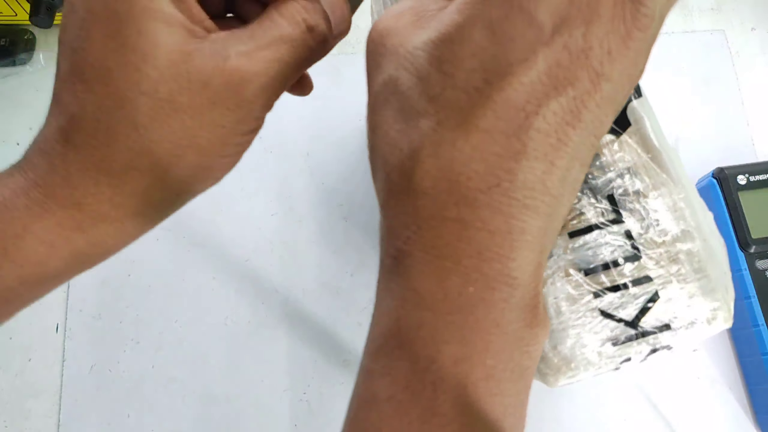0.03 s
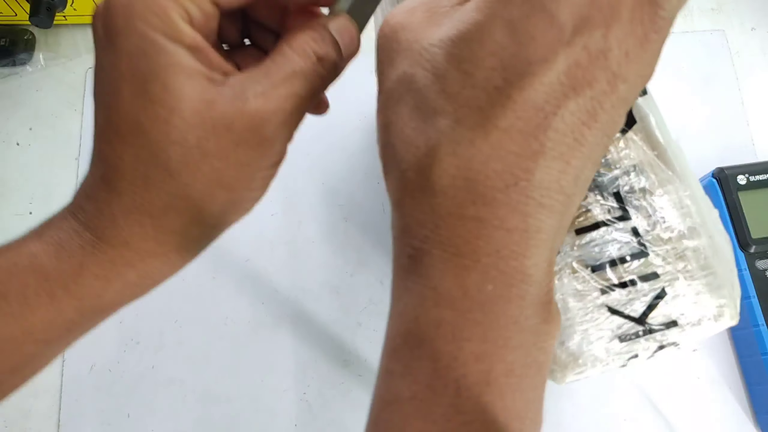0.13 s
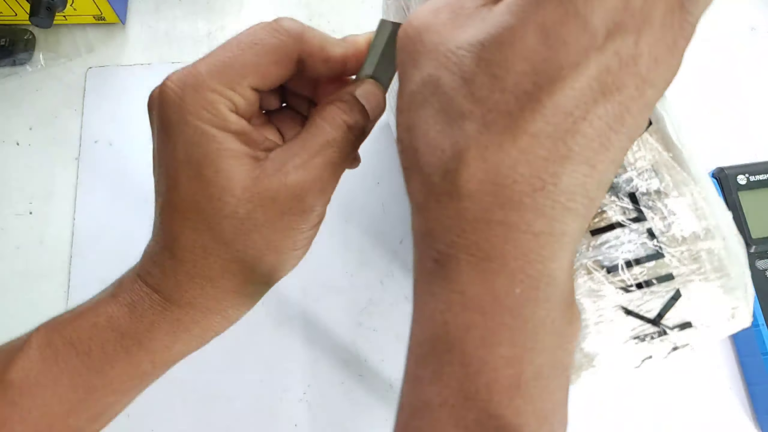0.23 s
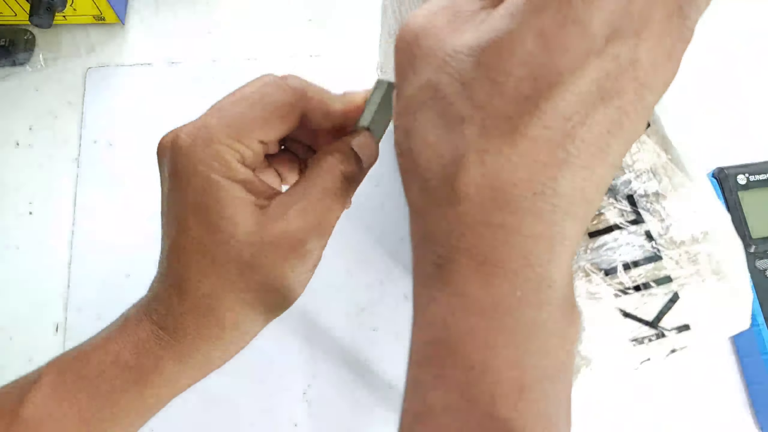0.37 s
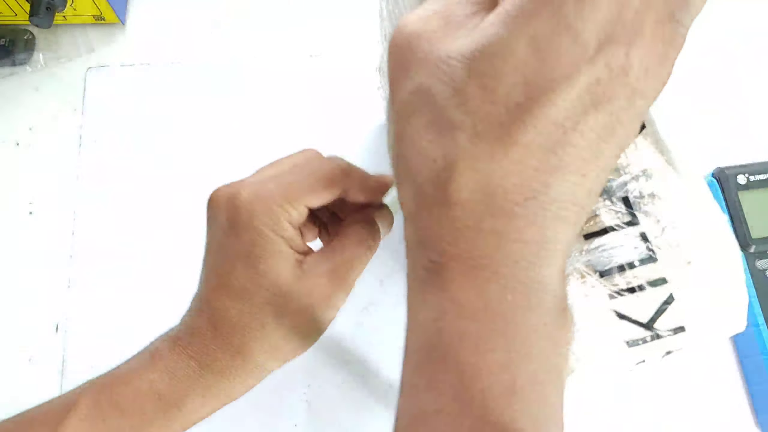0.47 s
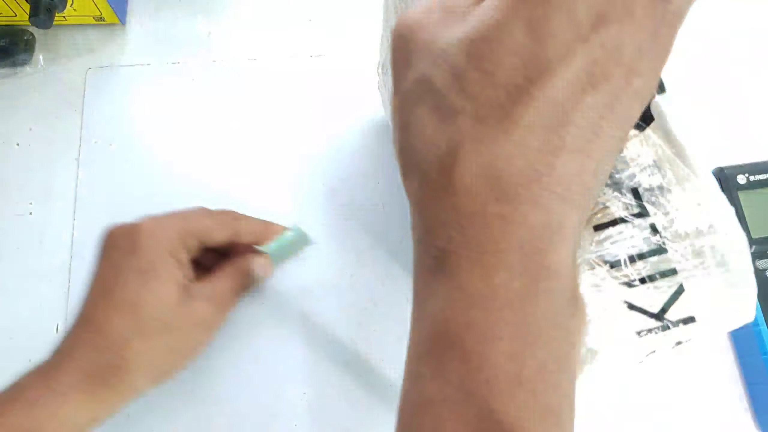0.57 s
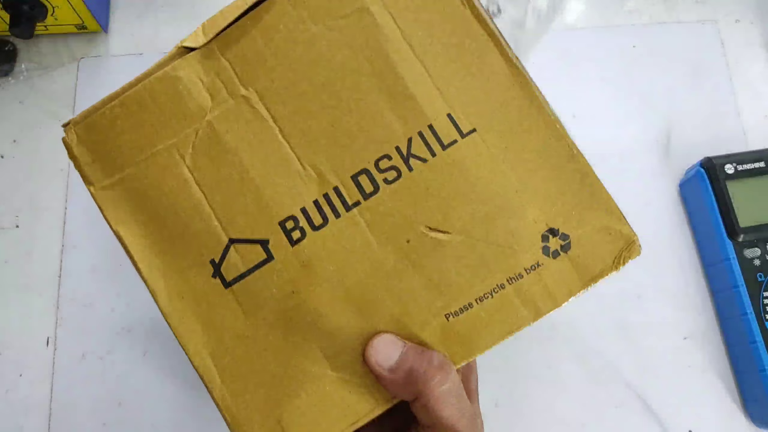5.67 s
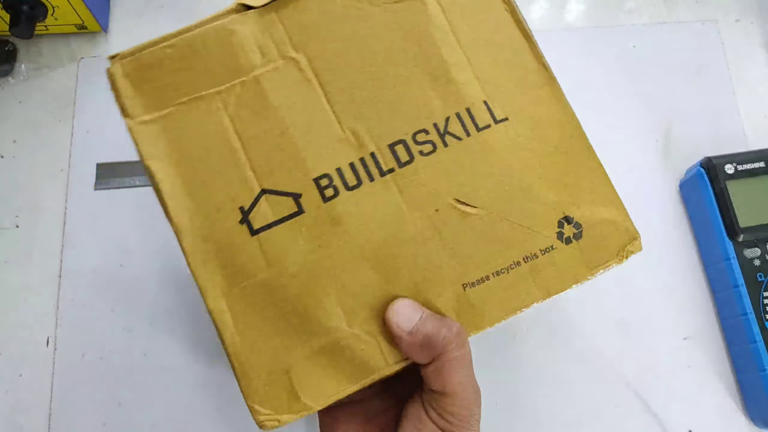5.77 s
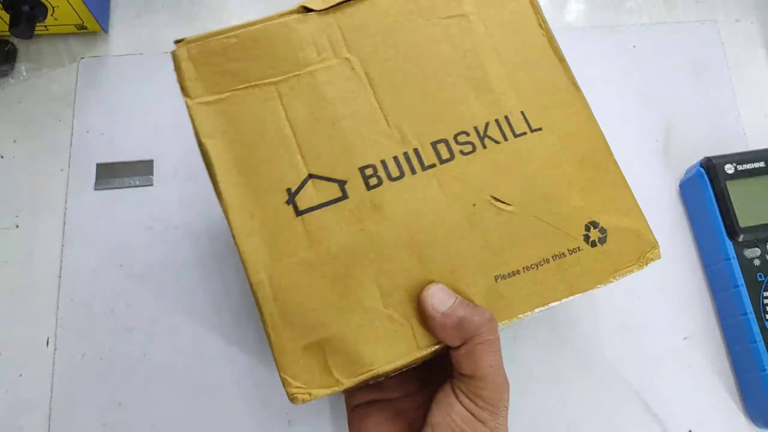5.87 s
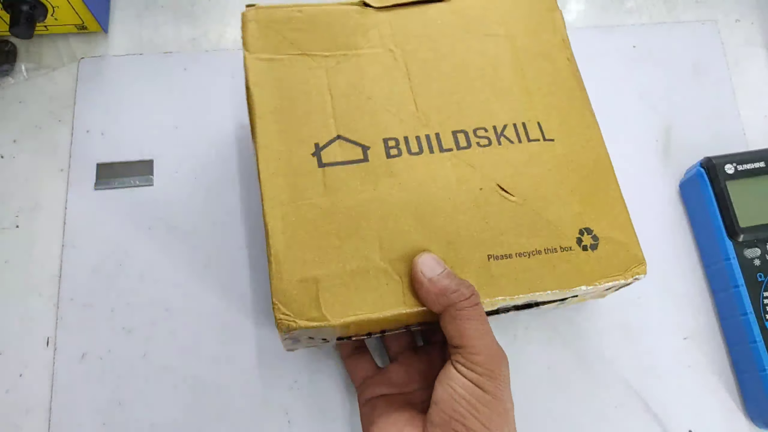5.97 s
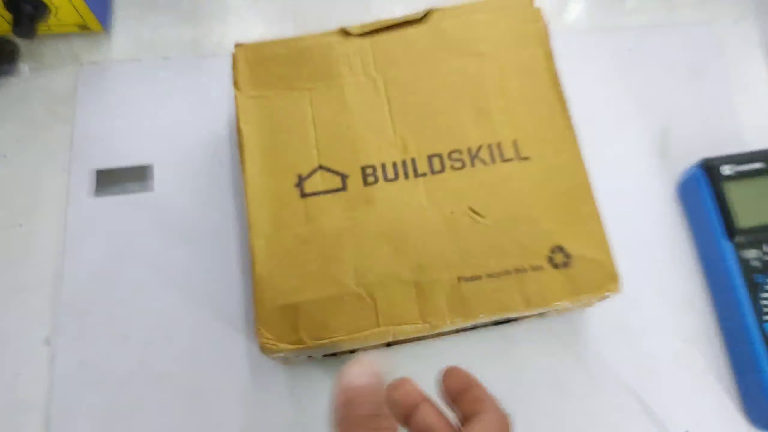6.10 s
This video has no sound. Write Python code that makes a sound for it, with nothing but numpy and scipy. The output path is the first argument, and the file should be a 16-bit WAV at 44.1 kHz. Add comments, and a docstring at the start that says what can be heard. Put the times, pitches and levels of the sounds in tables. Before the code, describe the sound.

Close, dry sound of plastic film being pulled off a small cardboard box in a quiet room. From 0 to 1 s, light crinkles, small snaps and card rasps come in short tugs, with a ragged low groan near 0.45 s and faint hoarse squeaks. At 1.15 to 1.45 s a dense, bright tearing burst cracks sharply, the loudest crackling. It eases, then hollow panel knocks land around 1.8 to 2.2 s, strongest at 1.93 and 2.18. From 2.4 to 3.3 s tugs crackle steadily, with dull taps near 2.9 and a low thump at 3.24. A short creak slows at 3.4 to 3.57 s. Snaps and rasping continue to 4.5 s, nearly stop around 4.77, then return with a crack at 5.04. Sparse rustles and light knocks at 5.45 to 5.6 fade before a firm low thump at 6.1 s. Low rumble swells beneath.

```python
"""Plastic wrap is pulled and torn off a small cardboard box close by, over a desk.
The film crinkles, the card rasps and the panels drone: countless tiny random slips, each layer with its colour.
Creases snap as short decaying tones with noise bursts; knocks flex a panel and ring the modes of the box.
The film squeaks as hoarse narrow noise, and sticks and slips in a low groan and a creak that ends slower.
Slow low noise rumbles as the box moves; a short room tail and a faint quiet-room noise surround it all."""
import sys
import numpy as np
from scipy import signal
from scipy.fft import rfft, irfft, next_fast_len
from scipy.io import wavfile
from scipy.ndimage import uniform_filter1d

SR = 44100
rng = np.random.default_rng(int(sys.argv[2]) if len(sys.argv) > 2 else 0)


def inscribe(sig):
    """Save sig as 16-bit PCM at rate SR to the path in sys.argv[1].

    A 1-D sig is mono; a 2-D sig holds one channel per row.
    Samples are clipped to [-1, 1] before scaling.
    """
    pcm = np.round(np.clip(np.atleast_2d(sig).T, -1, 1) * 32767)
    wavfile.write(sys.argv[1], SR, pcm.astype(np.int16))


N = 270553   # length of the scene in samples


def from_db(db):
    """Turn decibels into a gain."""
    return 10 ** (np.asarray(db) / 20)


def rms_one(x):
    """Scale to unit power."""
    return x / np.sqrt(np.mean(x ** 2) + 1e-20)


def in_time(rows):
    """Draw straight lines between the rows of a table, giving each column a value at every sample."""
    s, *columns = np.transpose(rows)
    return [np.interp(np.arange(N) / SR, s, column) for column in columns]


def add(out, s, sound):
    """Mix a sound into out, starting at s seconds."""
    start = max(round(s * SR), 0)
    part = out[start:start + len(sound)]
    part += sound[:len(part)]


def drift(rate_hz):
    """Smooth random wandering with a spread of about 1; a higher rate wanders faster."""
    step = 40   # samples between the slow values, joined by straight lines
    r = np.exp(-2 * step * np.pi * rate_hz / SR)
    noise = rng.standard_normal(N // step + 2002)
    slow = signal.lfilter([1], [1, -2 * r, r * r], noise)[2000:]   # drop the filter's start-up
    return np.interp(np.arange(N) / step, np.arange(len(slow)), rms_one(slow))


def fade(t, t60):
    """Exponential decay that falls by 60 dB in t60 seconds."""
    return np.exp(-np.log(1000) * t / max(t60, 1e-4))


def resonate(x, hz, width_hz):
    """Ring at one pitch; the gain is 1 at the top of the resonance."""
    r = np.exp(-np.pi * width_hz / SR)
    top = np.array([1, 0, -1]) * (1 - r * r) / 2
    return signal.lfilter(top, [1, -2 * r * np.cos(2 * np.pi * hz / SR), r * r], x + 1e-18)


def colour(x, spectrum):
    """Filter to the given spectrum without sounding early, falling 20 dB per octave beyond its ends."""
    size = 2 * next_fast_len(len(x))
    octave = np.log2(np.maximum(np.arange(size // 2 + 1) * SR / size, 1))
    hz, db = np.transpose(spectrum)
    outside = np.abs(octave - np.clip(octave, np.log2(hz[0]), np.log2(hz[-1])))
    gain_db = np.interp(octave, np.log2(hz), db) - 20 * outside
    # folding the cepstrum forward in time gives a minimum-phase filter
    cepstrum = irfft(np.log(from_db(gain_db)))
    cepstrum[1:size // 2] *= 2
    cepstrum[size // 2 + 1:] = 0
    return irfft(rfft(x, size) * np.exp(rfft(cepstrum, size)))[:len(x)]


def friction(spectrum, per_s, spread_db, hiss_db, flutter_db, shimmer_db=4.0, even_s=0.063):
    """Countless tiny slips of uneven size, each with a pitch of its own, over a fine hiss; about unit power."""
    born = rng.random(N) < per_s / SR
    sizes = from_db(spread_db * np.minimum(rng.exponential(1, N), 3))
    slips = rms_one(born * sizes * rng.choice([-1, 1], N))
    pitches = np.geomspace(spectrum[0][0], min(spectrum[-1][0], SR / 3), 16)
    dealt = rng.integers(0, len(pitches), N)
    force = slips + from_db(hiss_db) * rng.standard_normal(N)
    # each patch of the surface rings for a few cycles at its own pitch, and comes into and out of contact
    grains = np.zeros(N)
    for k, hz in enumerate(pitches):
        patch = resonate(force * (dealt == k), hz, 0.19 * hz)
        grains += patch * from_db(shimmer_db * drift(30.5))
    # slips come in clumps, while the hand keeps the mean effort steady
    rub = rms_one(colour(grains, spectrum)) * from_db(flutter_db * drift(131))
    return rub / np.sqrt(uniform_filter1d(rub ** 2, max(int(even_s * SR), 2)) + 1e-9)


# Steady handling between the tugs, with two rests.
# Each row: time in seconds, crinkle of the film in dB, rasp of the card in dB.
STEADY_PULL = [(0.0, -49.5, -61), (0.27, -48.5, -47), (0.59, -40.5, -53), (0.8, -43.5, -50),
               (1.13, -37, -51), (1.48, -35, -52.5), (1.68, -43, -47.5), (2.3, -37.5, -40),
               (2.78, -39.5, -45.5), (3.3, -37, -44.5), (4.0, -36, -41), (4.24, -38.5, -47),
               (4.5, -41, -43.5), (4.77, -66.5, -71), (4.88, -49.5, -44), (5.08, -43, -41.5),
               (5.24, -46.5, -45), (5.31, -55.5, -56.5), (5.42, -43.5, -42), (5.69, -43, -47),
               (5.88, -51, -56), (6.13, -59, -52)]
DRONE_RE_RASP_DB = -4.5   # between tugs the panels drone in step with the rasp
# Moments when the film hangs slack and the rubbing drops. Each row: start in seconds, end in seconds.
SLACK_MOMENTS = [(0.557, 0.64), (2.328, 2.35), (3.063, 3.07), (3.587, 3.619), (4.216, 4.244)]
SLACK_DB, SLACK_EASE_S = -11, 0.0018   # size of the drop, and time to ease in or out


def effort():
    """The hand's steady pull plus tugs, less the slack moments: levels of crinkle, rasp and drone in dB."""
    film_db, card_db = in_time(STEADY_PULL)
    steady = from_db([film_db, card_db, card_db + DRONE_RE_RASP_DB])
    t = np.arange(N) / SR
    slack = np.zeros(N)
    for start, end in SLACK_MOMENTS:
        slack += np.clip(np.minimum(t - start, end - t) / SLACK_EASE_S, 0, 1)
    return 10 * np.log10(steady ** 2 + tugs()) + SLACK_DB * slack


# Colours of the three rubbing layers: the film, the card, and the panels of the box.
# Each row: pitch in Hz, relative filter gain in dB.
FILM_COLOUR = [(1200, -13.5), (2000, -2.5), (2800, 0.5), (4000, 1), (7500, 3.5), (10000, 1.5), (13000, -4),
               (16000, -6)]
CARD_COLOUR = [(400, -15), (600, 2), (900, 3.5), (1300, 5), (1800, 3.5), (2700, -2), (4000, -2.5),
               (7000, -22)]
PANEL_COLOUR = [(50, 3.5), (90, -7), (140, -9), (215, -1.5), (320, -2), (390, -6.5), (460, 2.5),
                (600, -15.5), (900, -10.5)]


def rubbing():
    """The film crinkles brightly; sliding makes the card rasp and the panels drone."""
    crinkle_db, rasp_db, drone_db = effort()
    film = friction(FILM_COLOUR, per_s=1200, spread_db=1.0, hiss_db=5.5, flutter_db=2.5, shimmer_db=2.5)
    card = friction(CARD_COLOUR, per_s=350, spread_db=3.0, hiss_db=7.0, flutter_db=3.0)
    panels = friction(PANEL_COLOUR, per_s=460, spread_db=2.5, hiss_db=-3.0, flutter_db=4.0)
    return from_db(crinkle_db) * film + from_db(rasp_db) * card + from_db(drone_db) * panels


# Air pushed about by the moving box. Each row: time in seconds, rumble in dB.
SWAY_LEVELS = [(0.0, -44), (0.26, -34.5), (1.45, -33), (1.93, -51), (1.98, -23), (2.15, -37.5), (2.22, -24),
               (2.66, -42), (2.9, -31), (3.96, -38.5), (4.01, -20), (4.13, -30.5), (5.34, -46.5),
               (5.63, -33), (5.84, -48.5), (6.13, -37)]
# Colour of that air. Each row: pitch in Hz, relative filter gain in dB.
RUMBLE_COLOUR = [(25, 8), (35, -12), (50, -17.5), (80, -24.5), (300, -39)]


def rumble():
    """Slow swells of air from the moving box: low noise, evened out and then shaped by the sway."""
    sway_db, = in_time(SWAY_LEVELS)
    air = colour(rng.standard_normal(N), RUMBLE_COLOUR)
    even_air = air / np.sqrt(uniform_filter1d(air ** 2, SR // 10) + 1e-12)
    return from_db(sway_db) * even_air


# Colour of the quiet room. Each row: pitch in Hz, relative filter gain in dB.
AMBIENCE_COLOUR = [(60, -7), (700, -12), (8000, -68), (16000, -46)]
AMBIENCE_DB = -64


def ambience():
    """The quiet room: faint, steady noise that is mostly low."""
    return from_db(AMBIENCE_DB) * rms_one(colour(rng.standard_normal(N), AMBIENCE_COLOUR))


ROOM_T60_S, ROOM_DB = 0.056, -14   # decay of the tail, and its level against the handling


def room(x):
    """The desk and near walls return a short diffuse tail, beginning after 4 ms."""
    t = np.arange(SR // 2) / SR
    tail = rng.standard_normal(len(t)) * fade(t, ROOM_T60_S) * (t > .004)
    return signal.fftconvolve(x, tail / np.linalg.norm(tail))[:N]


# Tugs that drag the film over the box.
# Each row: start in seconds, length in seconds, crinkle in dB, rasp in dB, drone of the panels in dB.
TUG_EVENTS = [(0.031, 0.061, -31.5, -35.5, -40), (0.215, 0.074, -44.5, -43, -43.5),
              (0.319, 0.29, -51, -41, -44), (0.433, 0.11, -35, -32, -38), (0.701, 0.032, -29, -36, -39.5),
              (0.725, 0.084, -37.5, -52, -51), (0.866, 0.044, -35, -49, -46),
              (1.15, 0.1, -25.5, -33.5, -47), (1.207, 0.019, -18.5, -27, -29.5),
              (1.233, 0.045, -21.5, -31.5, -43), (1.285, 0.083, -34, -39, -46),
              (1.319, 0.155, -25.5, -40, -44), (1.552, 0.086, -37.5, -45, -51),
              (1.72, 0.014, -31, -34.5, -37), (1.834, 0.07, -71, -57, -40.5),
              (1.928, 0.024, -35, -31.5, -28), (2.039, 0.044, -34.5, -45, -42),
              (2.174, 0.015, -33, -25.5, -24), (2.41, 0.071, -31, -36.5, -44),
              (2.509, 0.05, -33.5, -42, -43), (2.559, 0.076, -28.5, -37.5, -49),
              (2.677, 0.061, -37, -38.5, -43.5), (2.82, 0.099, -31, -41, -37.5),
              (2.907, 0.1, -31.5, -43, -68), (3.087, 0.054, -31.5, -40, -45),
              (3.164, 0.033, -33.5, -38.5, -43), (3.224, 0.044, -37.5, -37.5, -35),
              (3.316, 0.052, -53, -40, -35.5), (3.374, 0.23, -41.5, -38.5, -45.5),
              (3.744, 0.16, -42, -38, -40.5), (3.969, 0.02, -51, -34.5, -37.5),
              (4.141, 0.036, -41, -41, -49), (4.291, 0.17, -38.5, -40, -42), (4.89, 0.081, -34.5, -47, -45),
              (4.983, 0.059, -32.5, -35, -39.5), (5.451, 0.015, -51, -38, -29),
              (5.586, 0.072, -37, -46.5, -42), (5.684, 0.022, -36, -40.5, -35.5), (6, 0.063, -47, -44, -38),
              (6.063, 0.044, -40, -38.5, -39)]
TUG_SWELL_SHARE, TUG_RELEASE_T60_S = 0.13, 0.077   # a tug swells over this share of its length
TUG_SAG_DB_PER_S = 1   # the film slackens as it gives


def tugs():
    """Each tug takes hold, sags and lets go; power of crinkle, rasp and drone over time."""
    power, t = np.zeros((3, N)), np.arange(SR // 2) / SR
    for s, length, *levels_db in TUG_EVENTS:
        held = np.minimum(t / (TUG_SWELL_SHARE * length), 1) * from_db(-TUG_SAG_DB_PER_S * t)
        shape = held * fade(np.maximum(t - length, 0), TUG_RELEASE_T60_S)
        for layer, db in zip(power, levels_db):
            add(layer, s, (from_db(db) * shape) ** 2)
    return power


STRAY_PER_S = 15   # mean rate of the small snaps
STRAY_OVER_CRINKLE_DB, STRAY_SPREAD_DB = 8, 3   # level above the crinkle, and how far it varies either way


def stray_snaps(low_hz=2200, high_hz=7500):
    """Small creases give at chance times and pitches, following the crinkle: rows of s, level dB, pitch Hz."""
    gap, size, pitch = rng.random((240, 3)).T   # more rows than needed
    s = np.cumsum(2 * gap) / STRAY_PER_S
    crinkle_db = np.interp(s * SR, np.arange(N), effort()[0])
    db = crinkle_db + STRAY_OVER_CRINKLE_DB + STRAY_SPREAD_DB * (2 * size - 1)
    hz = low_hz * (high_hz / low_hz) ** pitch
    return [row for row in zip(s, db, hz) if row[0] < N / SR]


# Creases that snap through. Each row: time in seconds when one gives, level in dB, pitch in Hz.
CREASE_SNAPS = [(0.042, -14.5, 3650), (0.1175, -29, 1620), (0.164, -29, 4540), (0.281, -21.5, 9650),
                (0.4408, -17.5, 1410), (0.7075, -22, 1290), (0.7135, -16.5, 3620), (1.1686, -7.5, 3030),
                (1.185, -9, 3100), (1.2059, -4, 4040), (1.2094, -14, 3240), (1.2198, -11, 1390),
                (1.232, -6.5, 3540), (1.356, -11.5, 5500), (1.342, -23, 7310), (1.395, -8.5, 7550),
                (1.4475, -12, 3220), (1.63, -24, 2660), (1.705, -21.5, 8900), (1.724, -21, 2190),
                (1.935, -16, 1100), (2.06, -13, 1170), (2.177, -13.5, 1830), (2.183, -19, 2160),
                (2.218, -17, 4900), (2.288, -26, 3300), (2.358, -21, 1500), (2.377, -20.5, 7350),
                (2.421, -15.5, 2560), (2.4716, -17.5, 2590), (2.5165, -15, 1480), (2.534, -15, 10500),
                (2.5698, -8.5, 2500), (2.583, -13, 4700), (2.633, -26, 1510), (2.8449, -15, 1430),
                (2.9086, -18, 1010), (2.961, -16.5, 3570), (3.036, -22, 1900), (3.095, -15.5, 8250),
                (3.126, -12.5, 4800), (3.177, -12, 3820), (3.324, -18, 1400), (3.4187, -20, 6300),
                (3.43, -22.5, 2480), (3.548, -21, 2560), (3.576, -24, 2460), (3.8135, -14, 1130),
                (3.971, -11.5, 3680), (3.984, -22, 1840), (4.039, -11, 7000), (4.139, -27, 6300),
                (4.246, -22.5, 6170), (4.286, -8, 3300), (4.384, -15, 3500), (4.429, -18.5, 3840),
                (4.474, -12.5, 1790), (4.533, -20, 2440), (4.656, -33, 2730), (4.6944, -35, 8500),
                (4.825, -37.5, 1580), (4.896, -20.5, 1980), (4.9998, -17, 3680), (5.035, -23, 1600),
                (5.0372, -9, 1590), (5.0867, -23, 1480), (5.171, -28, 2800), (5.457, -14, 2000),
                (5.643, -23, 10400), (5.735, -33, 7000), (5.784, -28, 7000), (5.869, -35, 4600),
                (6.1135, -25.5, 1130)]
CRACK_CYCLES = 7   # the crack falls by 60 dB in this many cycles


def snaps(crack_db=-4.0, crumple_t60=0.015, crumple_db=-0.5,
          shiver_t60=0.027, shiver_db=-3.5, shiver_reach=2.8, give_s=.0007):
    """A crease starts to give, cracks and crumples, and the sheet around it shivers."""
    lead = .01   # seconds of build-up before the crack
    out, t = np.zeros(N), np.arange(SR // 10) / SR - lead
    build_up, after = np.exp(np.minimum(t, 0) / give_s), np.maximum(t, 0)
    for s, db, hz in CREASE_SNAPS + stray_snaps():
        crack = np.sin(2 * np.pi * hz * after) * fade(after, CRACK_CYCLES / hz)
        crumple = resonate(rng.standard_normal(len(t)) * (t > 0) * fade(after, crumple_t60), hz, 0.35 * hz)
        shiver = colour(rng.standard_normal(len(t)) * build_up * fade(after, shiver_t60), FILM_COLOUR)
        # duller for a low crack
        shiver = signal.lfilter([1], [1, -np.exp(-2 * np.pi * shiver_reach * hz / SR)], shiver)
        snap = from_db(crack_db) * crack
        snap += from_db(crumple_db) * crumple / np.abs(crumple).max()
        snap += from_db(shiver_db) * shiver / np.abs(shiver).max()
        add(out, s - lead + give_s, from_db(db) * snap)   # the crack comes just after the crease starts to give
    return out


# Knocks on the box, plus two short slips of the film at 2.874 and 2.887 s played the same way. # Each row:
# start in seconds, peak of the flexing panel in dB, its pitch in Hz, # its decay time in seconds (60 dB), ring
# of the box in dB against the flex, before a common lift.
BOX_KNOCKS = [(0.081, -26, 278, 0.033, -34), (0.188, -36, 320, 0.029, -4), (0.8, -28, 298, 0.012, -13),
              (1.221, -19, 205, 0.014, -8.5), (1.428, -31, 69, 0.039, -29), (1.825, -29, 400, .03, -16),
              (1.843, -27, 441, 0.14, -3), (1.879, -26, 240, 0.014, -11), (1.881, -26, 445, 0.11, -2),
              (1.932, -9, 201, 0.04, -18), (1.959, -19.5, 455, 0.032, -5.5), (1.975, -23, 450, 0.059, -20),
              (2.175, -5, 210, 0.014, -21), (2.195, -11.5, 91, 0.041, -15), (2.874, -16, 1240, 0.0035, -17),
              (2.887, -13.5, 960, 0.0016, -40), (3.241, -11.5, 57.7, 0.066, -28),
              (3.8, -23, 124, 0.037, -21), (3.812, -17, 290, 0.035, -4.5), (4.305, -17.5, 420, 0.011, -18),
              (4.325, -27.5, 517, 0.039, -20), (4.629, -38, 457, 0.022, -7),
              (5.037, -15.5, 190, 0.0044, -7.5), (5.459, -24, 766, 0.053, -6),
              (5.591, -20.5, 54, 0.064, -21), (5.618, -26, 64.4, 0.09, -10), (6.115, -7, 210, 0.026, -16.5)]
RING_LIFT_DB = 8.5   # added to the ring of every knock
# Modes of the box. Each row: pitch in Hz, relative level in dB, decay time in seconds (60 dB).
BOX_MODES = [(158, 8, 0.037), (211, -11, 0.11), (290, 5, 0.018), (449.6, -2.5, 0.072), (646, 1, 0.027),
             (740, -9, 0.057), (876, 1, 0.009), (1290, -3, 0.0037), (1740, -2, 0.024)]


def knocks(rise_cycles=0.35, contact_t60=0.0073):
    """A panel flexes for a few cycles, and the crunching contact sets the modes of the box ringing."""
    out, t = np.zeros(N), np.arange(SR // 4) / SR
    box = np.zeros(len(t))
    for k, (hz, db, t60) in enumerate(BOX_MODES):
        box += (-1) ** k * from_db(db) * np.sin(2 * np.pi * hz * t) * fade(t, t60)   # signs alternate
    for s, db, hz, t60, ring_db in BOX_KNOCKS:
        flex = np.sin(2 * np.pi * hz * t) * fade(t, t60) * (1 - np.exp(-t * hz / rise_cycles))
        contact = rng.standard_normal(len(t)) * fade(t, contact_t60)
        ring = signal.fftconvolve(contact, box)[:len(t)]
        knock = flex / np.abs(flex).max() + from_db(ring_db + RING_LIFT_DB) * ring / np.abs(ring).max()
        add(out, s, from_db(db) * knock)
    return out


# Hoarse squeaks of the dragged film. Each row: start in seconds, end in seconds, level in dB,
# first pitch in Hz, last pitch in Hz, half width of the noise band in Hz.
FILM_SQUEAKS = [(0.252, 0.29, -49, 2560, 2560, 89), (0.335, 0.405, -43, 2610, 2630, 100),
                (0.982, 1.163, -48, 2960, 3430, 260), (2.233, 2.268, -42, 740, 840, 150),
                (2.374, 2.411, -35.5, 798, 990, 191)]


def squeaks():
    """Taut film dragged over the box rings hoarsely, rising in pitch where it tightens."""
    out = np.zeros(N)
    for start, end, db, first_hz, last_hz, width_hz in FILM_SQUEAKS:
        size = max(int((end - start) * SR), 2)
        phase = 2 * np.pi * np.cumsum(np.linspace(first_hz, last_hz, size)) / SR
        # two slow noises wobble the tone's strength and phase, which makes it hoarse
        lowpass = signal.butter(2, width_hz, fs=SR, output="sos")
        grip = signal.sosfilt(lowpass, rng.standard_normal((2, size)))
        tone = rms_one(grip[0] * np.cos(phase) + grip[1] * np.sin(phase))
        add(out, start, from_db(db) * tone * signal.windows.tukey(size, .2))
    return out


def creak(slips, modes, jitter, uneven_db, detune):
    """Separate slips each kick well damped modes of the card, and stop dead when the film comes free."""
    out, t = np.zeros(N), np.arange(SR // 20) / SR
    times, per_s, peak_db = np.transpose(slips)
    s = times[0]
    for late, strong, taut in rng.standard_normal((60, 3)):   # at most 60 slips
        if s < times[-1]:
            pitch = np.exp(detune * taut)   # the tension differs from slip to slip
            slip = np.zeros(len(t))
            for hz, db, width in modes:
                swell = width * t * np.exp(-np.pi * width * t)
                slip += from_db(db) * swell * np.sin(2 * np.pi * hz * pitch * t)
            slip_db = np.interp(s, times, peak_db) + uneven_db * strong
            add(out, s, from_db(slip_db) * slip / np.abs(slip).max())
        s += np.exp(jitter * late) / np.interp(s, times, per_s)
    return out


# The film sticks and slips, once on a broad face of the box and once on an edge.
# Each row: time in seconds, typical slips per second, typical peak in dB.
FACE_STICK_SLIPS = [(0.441, 85, -20), (0.556, 85, -17.5)]
EDGE_STICK_SLIPS = [(3.405, 148.4, -30), (3.44, 172.8, -25), (3.48, 160, -25.5), (3.506, 115.2, -19.5),
                    (3.574, 87.4, -21)]
# What the slips set ringing. Each row: typical pitch in Hz, relative level in dB, damping width in Hz.
FACE_RINGING = [(290, 3, 240), (706, -9, 170), (1400, -33, 200)]
EDGE_RINGING = [(995, 0, 420)]


def creaks():
    """A ragged low groan on the face of the box, and a more even creak on its edge that ends slower."""
    groan = creak(FACE_STICK_SLIPS, FACE_RINGING, jitter=0.28, uneven_db=2.5, detune=0.13)
    edge = creak(EDGE_STICK_SLIPS, EDGE_RINGING, jitter=0.054, uneven_db=1.3, detune=0.031)
    return groan + edge


def scene():
    """Film and box close by, in a quiet small room."""
    handling = rubbing() + snaps() + knocks() + creaks() + squeaks()
    quiet_room = ambience()
    return (handling + from_db(ROOM_DB) * room(handling) + rumble() + quiet_room)[None]


CUTOFF_HZ = 16300   # nearly nothing is left above this


def record(dry):
    """The highest peaks are rounded off below 0.5 and the top is cut."""
    rounded = dry / (1 + (dry / .5) ** 6) ** (1 / 6)
    top_cut = signal.cheby2(12, 45, CUTOFF_HZ, fs=SR, output="sos")
    return signal.sosfiltfilt(top_cut, rounded)


dry = scene()
out = record(dry)
inscribe(out)
```